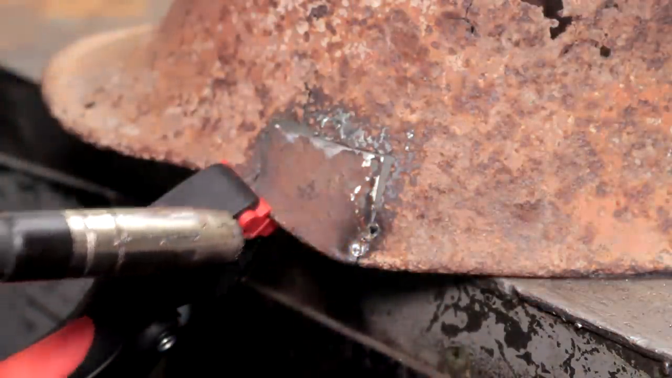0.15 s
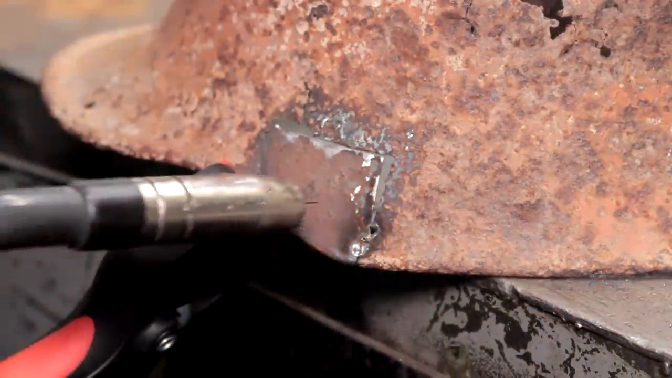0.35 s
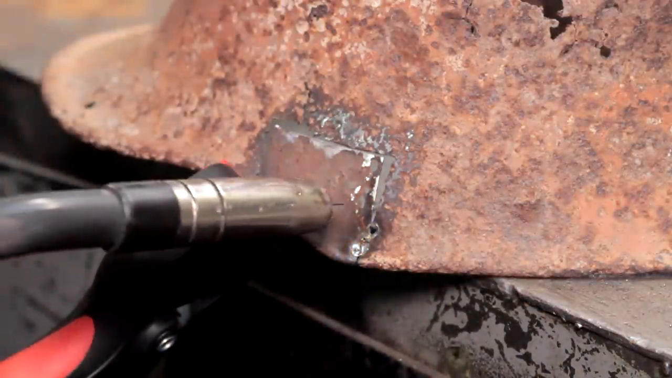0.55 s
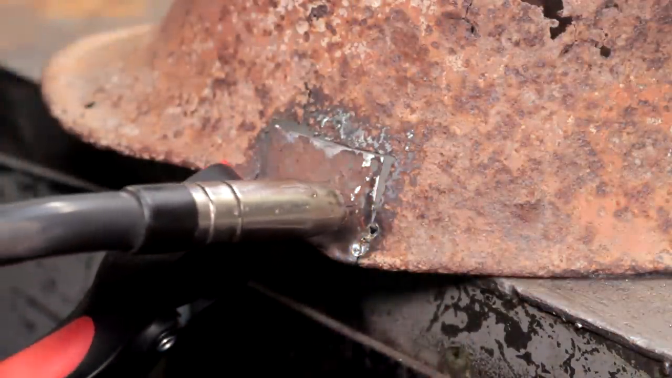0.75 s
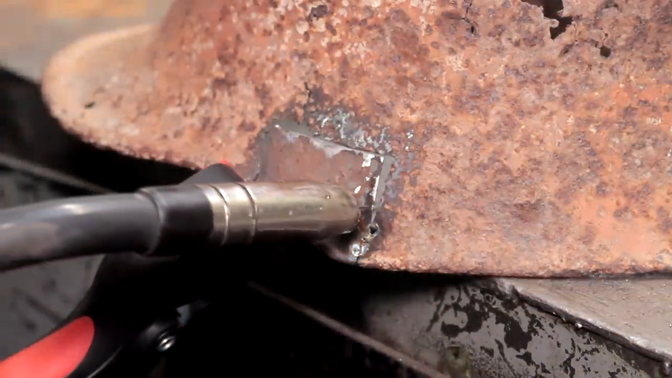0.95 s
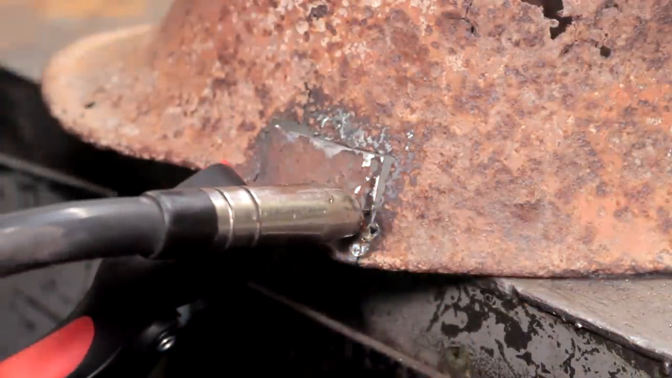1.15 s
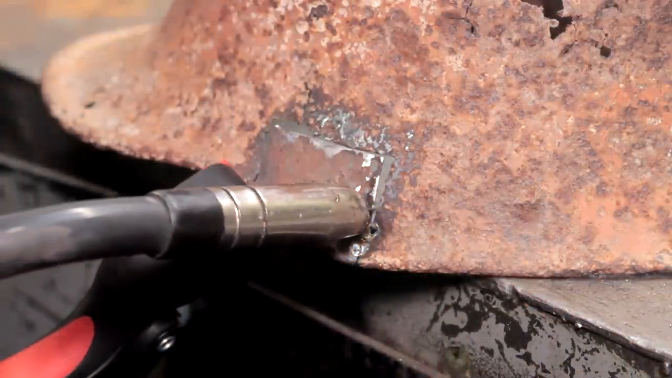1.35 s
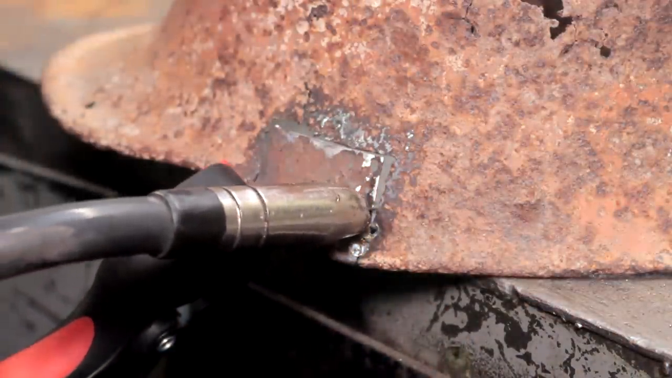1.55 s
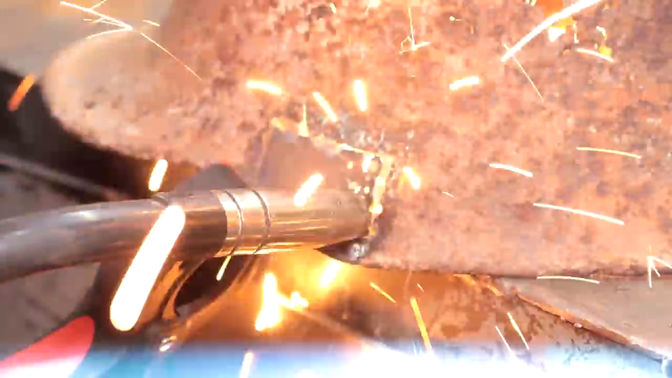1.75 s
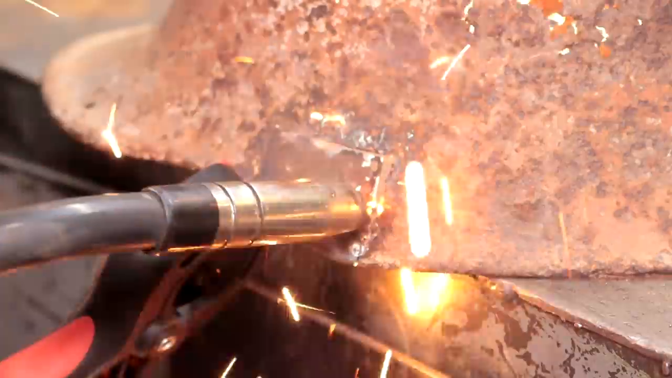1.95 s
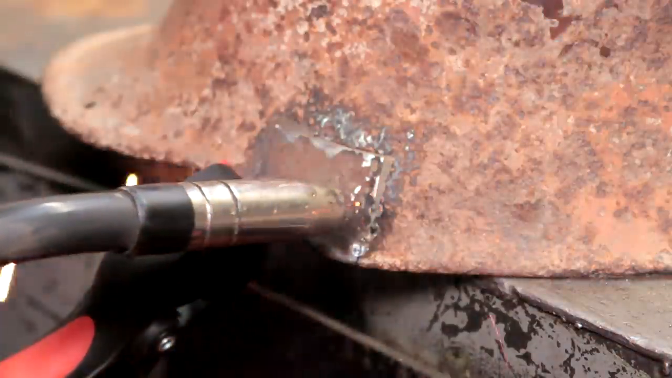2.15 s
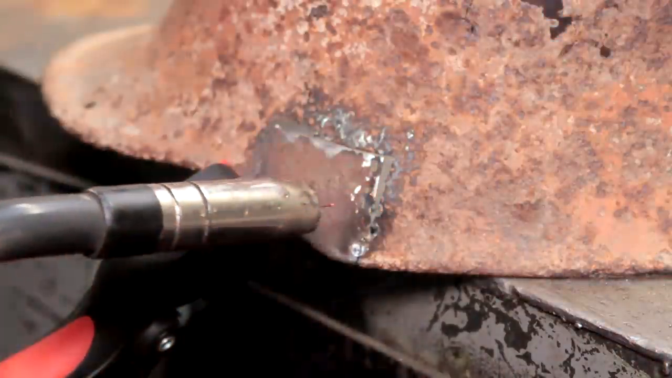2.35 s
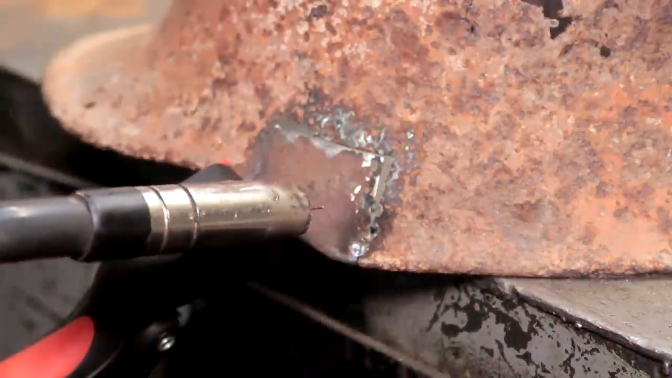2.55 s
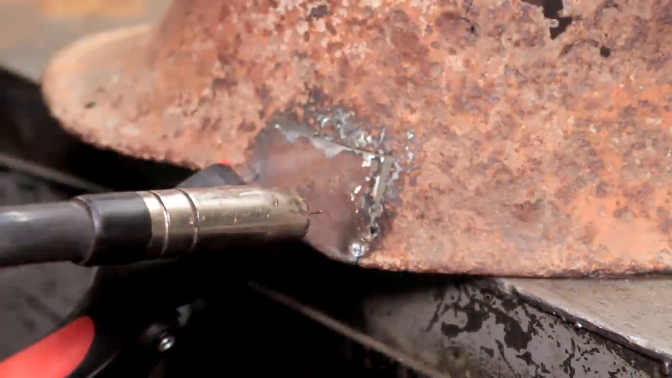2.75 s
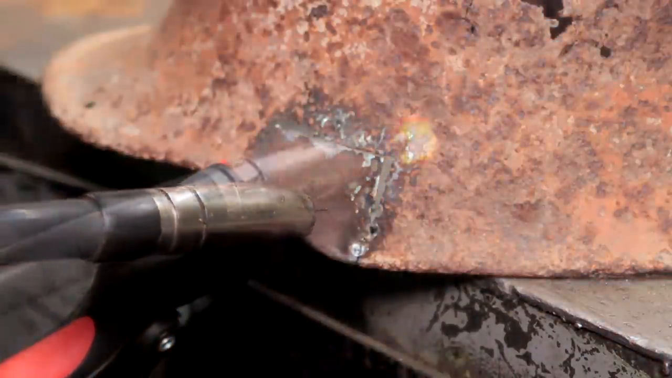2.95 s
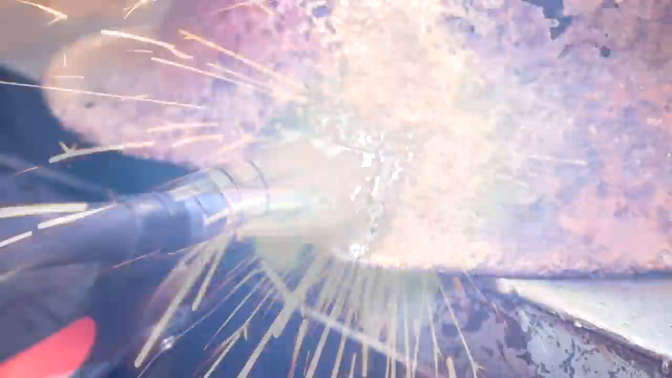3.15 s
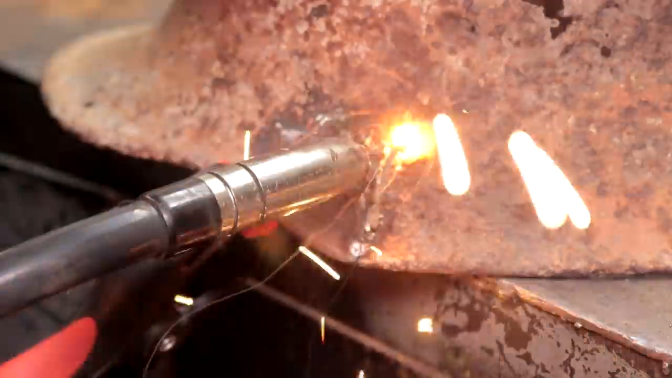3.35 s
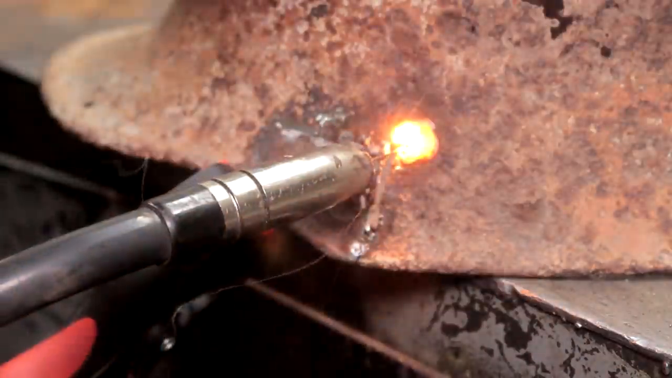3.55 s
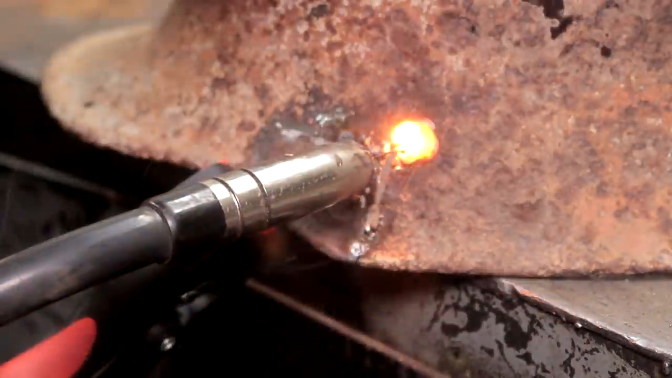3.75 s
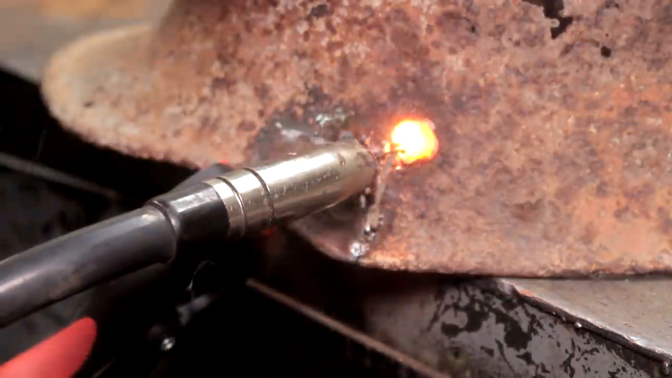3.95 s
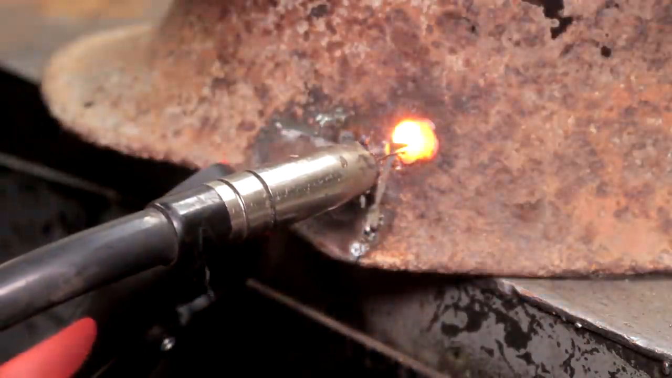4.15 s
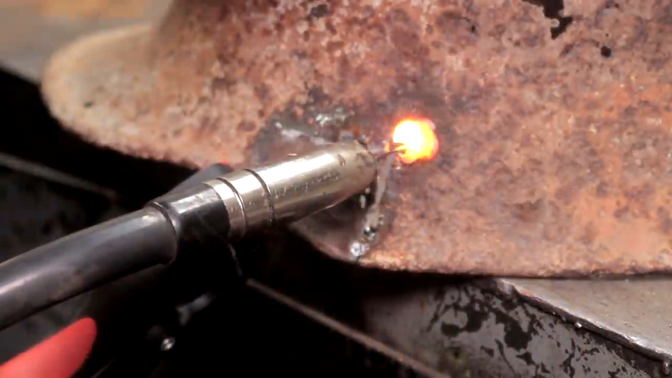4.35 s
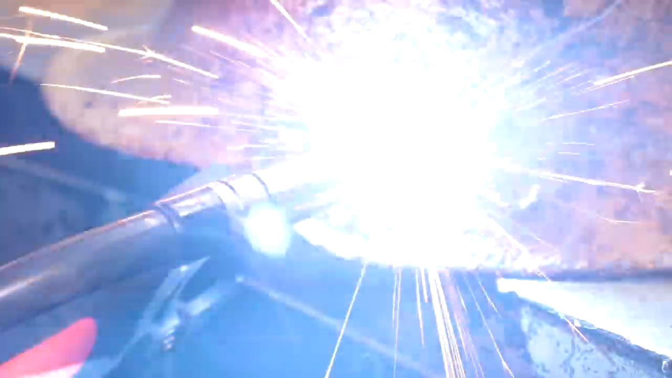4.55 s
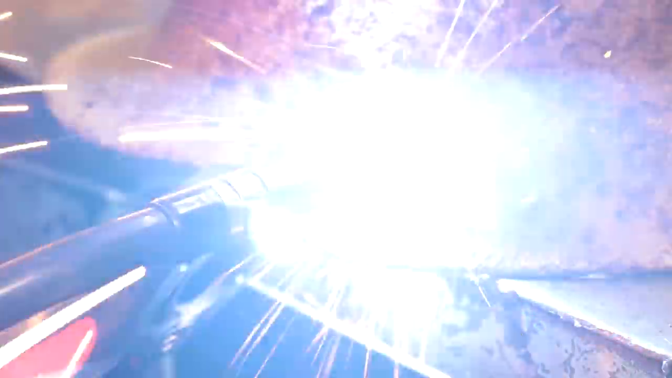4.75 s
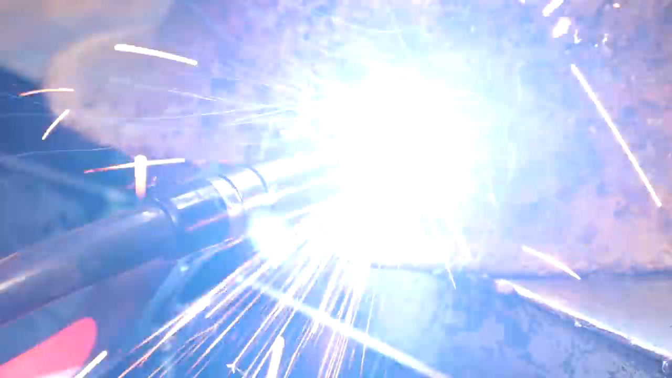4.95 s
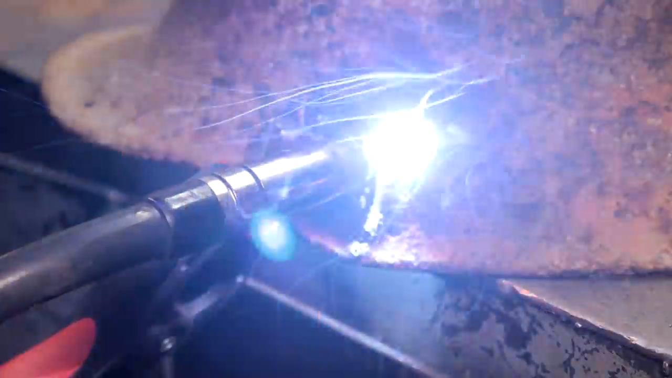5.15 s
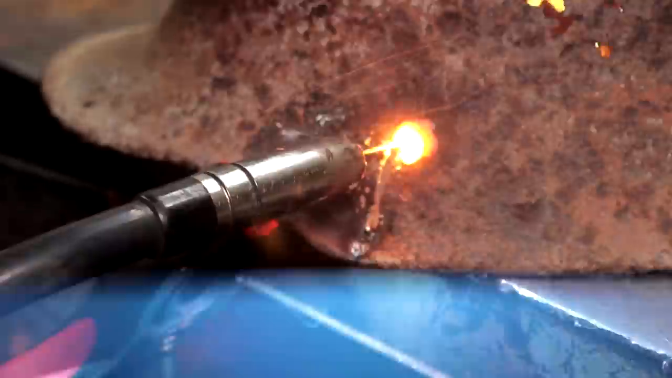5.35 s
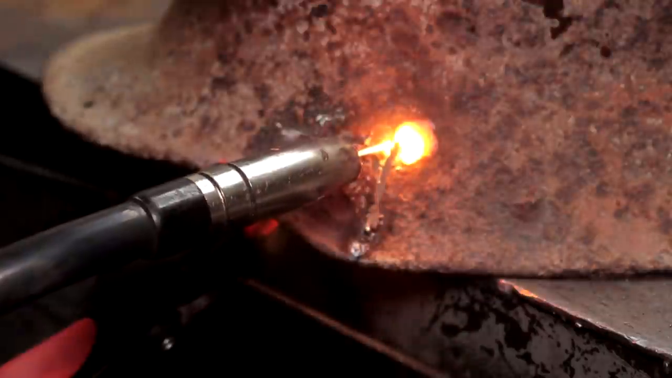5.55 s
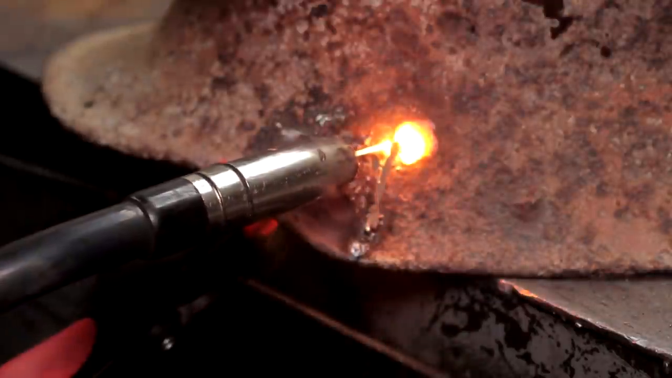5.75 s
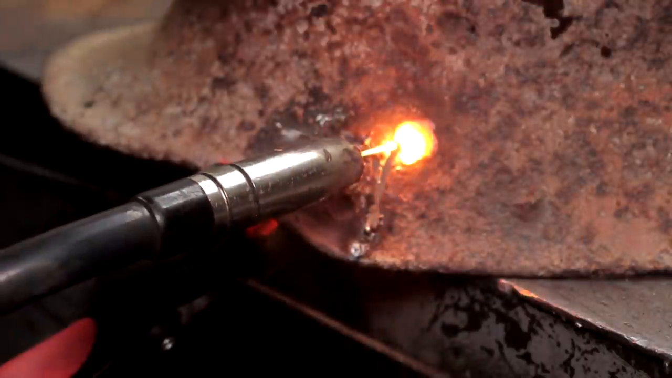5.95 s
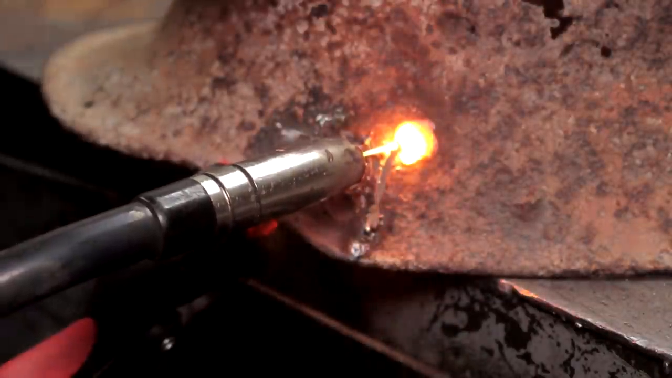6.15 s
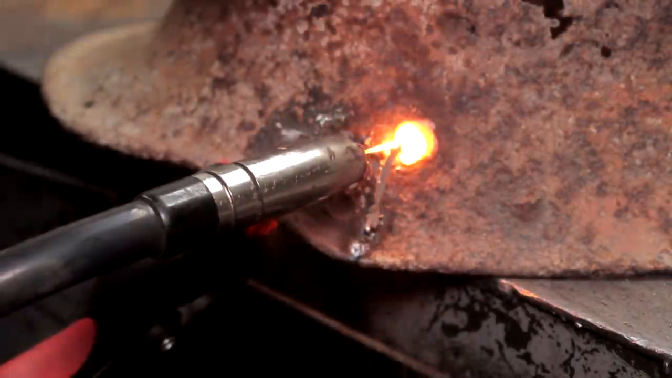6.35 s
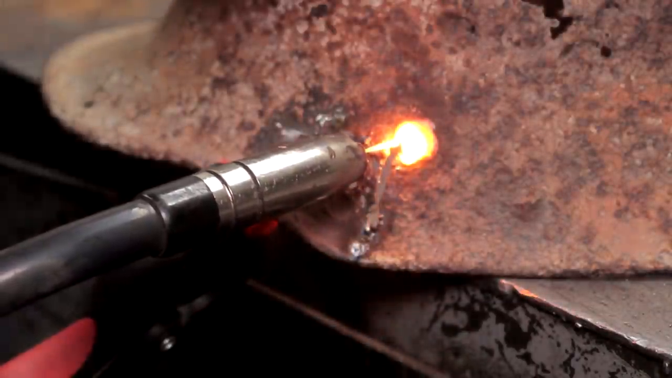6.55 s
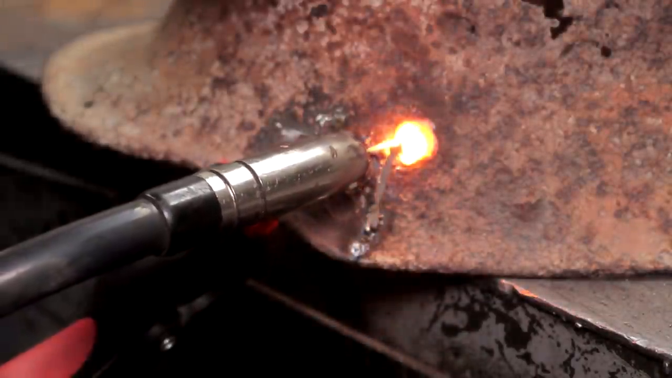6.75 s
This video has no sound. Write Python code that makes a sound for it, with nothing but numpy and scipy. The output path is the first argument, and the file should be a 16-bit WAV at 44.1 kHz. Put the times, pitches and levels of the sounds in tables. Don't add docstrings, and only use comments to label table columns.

```python
import sys
import numpy as np
from scipy import signal
from scipy.fft import rfft, irfft
from scipy.io import wavfile
from scipy.ndimage import uniform_filter1d

SR = 44100
rng = np.random.default_rng(int(sys.argv[2]) if len(sys.argv) > 2 else 0)


def master_out(mix):
    frames = np.transpose(np.atleast_2d(mix))
    ceiling = np.clip(frames, -1, 1)
    pcm = np.round(ceiling * 32767).astype(np.int16)
    wavfile.write(sys.argv[1], SR, pcm)


def linear_from_db(decibels):
    return 10 ** (np.asarray(decibels, float) / 20)


N = 299880


def evened(x):
    return x / np.sqrt(np.mean(x ** 2) + 1e-20)


def read(points, hz):
    f, value = np.transpose(points)
    return np.interp(np.log(hz + 1), np.log(f + 1), value)


def add(mix, s, sound):
    part = mix[..., round(s * SR):][..., :sound.shape[-1]]
    part += sound[..., :part.shape[-1]]


def colour(points):
    log_gain = np.log(linear_from_db(read(points, abs(np.fft.fftfreq(2048, 1 / SR)))))
    phase = -signal.hilbert(log_gain).imag
    taps = np.fft.ifft(np.exp(log_gain + 1j * phase)).real[:1024]
    return taps / np.linalg.norm(taps)


def noise(points, same, length=N):
    a, b = rng.standard_normal((2, length))
    pair = [a, same * a + np.sqrt(1 - same ** 2) * b]
    return signal.oaconvolve(pair, colour(points)[None], axes=1)[:, :length]


def wander(rate_hz):
    t = np.arange(N) / SR
    knots = np.arange(0, t[-1] + 1, 1 / rate_hz)
    return evened(np.interp(t, knots, rng.standard_normal(400)[:len(knots)]))


def shorts():
    # start_s, crack_db, sizzle_db
    first_tack = [(1.6331, -12, -30), (1.643, -36, -26.5), (1.6543, -13.5, -28), (1.6751, -9, -23),
                  (1.6957, -14.5, -29.5), (1.7135, -18, -29), (1.726, -33, -31.5), (1.8264, -29, -29.5),
                  (1.8545, -19.5, -26.5), (1.868, -33, -33), (1.9282, -23.5, -28.5), (1.943, -17.5, -30),
                  (2.284, -68, -66)]
    second_tack = [(3.0613, -21, -45.5), (3.1374, -42, -54), (3.1504, -36, -57), (3.1626, -30, -61),
                   (3.1749, -25, -40.5), (3.1882, -43, -35.5), (3.2018, -25, -34.5), (3.2156, -21.5, -42),
                   (3.227, -18.5, -37), (3.2402, -21, -35.5), (3.2566, -20, -37), (3.27, -18, -32),
                   (3.2857, -17.5, -30.5), (3.2991, -17, -35), (3.318, -19, -30.5), (3.3429, -22.5, -40)]
    third_tack = [(4.558, -27.5, -51), (4.612, -15.5, -37), (4.624, -22, -31.5), (4.6374, -24, -39),
                  (4.6466, -24, -38), (4.6549, -21.5, -37), (4.6695, -24.5, -44), (4.6743, -21, -33.5),
                  (4.6856, -29, -32.5), (4.6984, -23.5, -36.5), (4.7127, -20, -33.5), (4.7262, -15, -30.5),
                  (4.7422, -23, -29.5), (4.772, -15.5, -30), (4.8153, -15, -27.5), (4.862, -21, -28),
                  (4.8862, -16.5, -33),
                  (4.902, -19.5, -30.5), (4.9178, -21, -33), (4.9272, -25, -42.5), (4.9367, -21, -30),
                      (4.9541, -19, -34.5), (4.9592, -31, -33), (4.97, -20, -37), (4.9788, -28, -35),
                      (4.9876, -26.5, -33), (5.008, -32, -36), (5.0245, -25.5, -46), (5.0695, -23, -48),
                      (5.088, -23, -41), (5.1092, -20, -32), (5.1458, -23, -40), (5.178, -45, -49),
                      (5.223, -43, -57), (5.244, -18, -28), (5.2862, -26, -36), (5.3056, -20, -34),
                      (5.3201, -23, -33.5), (5.327, -27, -30.5), (5.4218, -19, -29.5)]
    return first_tack + second_tack + third_tack


def cracks():
    # pitch_hz, level_db
    crack_spectrum = [(300, -32), (700, -18), (1300, -10), (2700, -5), (5000, -3), (9000, -1), (13500, 0),
                      (16000, -3), (20000, -12)]
    # delay_ms, left_db, right_db
    reflections = [(.3, -11, -12), (1.1, -10, -5), (1.7, -13, -12), (2.2, -14, -11), (4.9, -19, -19)]
    # pitch_hz, level_db, t60_s
    steel_modes = [(1208, -7, 0.026), (2578, -18.5, .02), (4083, -10, 0.017), (6730, -9, 0.016)]
    cold_touches = [
        3.0615,
        4.558,
    ]
    t, paths, train = np.arange(2000) / SR, np.zeros((2, 400)), np.zeros((2, N))
    paths[:, 0] = 1
    for ms, *db in reflections:
        paths[:, round(ms * SR / 1e3)] += linear_from_db(db)

    for (s, db, _), rags in zip(shorts(), rng.standard_normal((len(shorts()), 3, 60))):
        burst = (0.12 * rags[0] + 0.14 * rags[1:]) * np.exp(-np.arange(60) / 14)
        burst[:, 0] = 1
        if min(abs(s - np.array(cold_touches))) < 0.003:
            burst = signal.lfilter([0.6], [1, -0.6], burst)
        add(train, s - 0.0001, linear_from_db(db) * burst)

    response = sum(linear_from_db(db - 60 * t / t60 - 21.5) * np.sin(2 * np.pi * hz * t) for hz, db, t60 in steel_modes)
    response[:1024] -= colour(crack_spectrum)
    shape = signal.fftconvolve(paths, response[None], axes=1)
    return linear_from_db(11.5) * signal.oaconvolve(train, shape, axes=1)[:, :N]


def sizzle():
    # pitch_hz, level_db
    sizzle_spectrum = [(350, -45.5), (600, -18.5), (1240, -3.5), (1830, -6.5), (2150, -4.5), (2370, -8),
                       (2800, -5), (8270, -1), (16000, -15)]
    rows, strikes = np.array(shorts()), np.zeros(N)
    strikes[np.round(rows[:, 0] * SR).astype(int)] = linear_from_db(rows[:, 2])
    t = np.arange(9000) / SR
    fade = linear_from_db(-120 * t / 0.066) + linear_from_db(-20 - 120 * t / 0.13)
    fade = fade * np.minimum(t / 0.0015, 1) ** 2
    power = abs(signal.oaconvolve(strikes ** 2, fade)[:N])
    grains = linear_from_db(3.7 * evened(uniform_filter1d(rng.standard_normal(N), size=24)))
    return linear_from_db(2) * np.sqrt(power) * evened(grains) * noise(sizzle_spectrum, same=0.35)


def push(ms):
    u = np.arange(1500) / SR * 1e3 / max(ms, 0.05)
    return np.exp(-2 * u) * np.cos(np.pi / 2 * u)


def blasts():
    # start_s, left_pressure, right_pressure, length_ms
    gas_blasts = [(1.643, 1, 0.8, 3.1), (1.6543, .05, 0.2, 2.7), (1.6758, .13, -0.2, 1.7),
                  (1.6957, 0.064, 0.29, 1), (1.8264, 0.06, .03, 1.9), (1.8544, 0.13, 0.1, 0.35),
                  (1.943, 0.28, 0.35, 0.78), (3.0602, 0.0041, -0.000063, 2), (3.1748, 0.037, 0.52, 2.9),
                  (3.1883, .16, 0.55, 5.6), (3.2146, .075, .34, 2.2), (3.2276, 0.59, -0.97, 3.1),
                  (3.2408, .096, .73, 6.2), (3.2568, 0.17, -0.61, 3), (3.27, .085, -0.26, .8),
                  (3.2857, 0.25, .26, 3.3), (3.3009, .014, .29, 4), (3.3182, 0.48, 0.13, 5.2),
                  (4.612, 0.73, 0.97, 0.69), (4.623, 0.36, -.63, 0.19), (4.6376, 0.23, 0.91, 0.077),
                   (4.6858, 0.056, -0.56, 0.52), (4.6985, 0.27, 0.19, 0.79), (4.7127, 1, -1.6, 0.075),
                   (4.7262, 0.21, 0.34, 0.57), (4.7436, 1, -2.2, 0.075), (4.772, 0.34, 0.81, 0.76),
                   (4.9377, 0.031, 0.11, 0.5), (4.9521, -0.083, 0.043, 0.45), (4.97, 0.0035, 0.059, .5),
                   (5.088, 0.073, 0.28, 0.45), (5.1087, -0.16, 0.224, 0.97), (5.1452, 0.086, 0.33, 0.46),
                   (5.245, 0.075, -0.0039, .9), (5.3056, 0.026, 0.025, .9), (5.423, 0.39, 0.64, 0.72)]
    # start_s, left_pressure, right_pressure, length_ms
    pinches = [
        (4.8158, 0.18, 0.79, 0.7),
        (4.8624, 0.17, 0.63, 0.78),
        (4.8843, 0.13, 0.39, 0.73),
    ]
    quick_ms, rebound_s, rebound_ms = 1.39, 0.00048, 6.9
    pinch_gap_s = 0.0011
    puff_db, puff_ms = -7, 0.59
    out = np.zeros((2, N))
    for s, left, right, ms in gas_blasts:
        add(out, s, np.outer([left, right], push(ms)))
        back = -0.181 * np.exp(-np.log(max(ms, 0.05) / quick_ms) ** 2)
        add(out, s + rebound_s, back * np.outer([left, right], push(rebound_ms)))

    for s, left, right, ms in pinches:
        add(out, s, -np.outer([left, right], push(ms)))
        add(out, s + pinch_gap_s, np.outer([1.03 * left, right], push(1.09 * ms)))

    for (s, db, _), chance in zip(shorts(), rng.standard_normal((len(shorts()), 3))):
        puff = push(puff_ms * np.exp(0.63 * chance[2]))
        add(out, s, linear_from_db(db + puff_db) * np.outer(chance[:2], puff))
    out = signal.sosfilt(signal.butter(2, 165, "high", fs=SR, output="sos"), out)
    return signal.sosfilt(signal.butter(2, 3500, fs=SR, output="sos"), out)


def gas():
    # open_s, arc_out_s, gas_flow_db, feeder_db
    pulls = [
        (1.518, 2.012, -62.5, -67.5),
        (2.972, 3.4, -65.5, -65.5),
        (4.368, 5.498, -66.5, -67),
        (6.763, 6.9, -64.5, -65),
    ]
    shutting = [
        2.15,
        3.612,
        5.708,
        7.0,
    ]
    # start_s, level_db, pitch_hz, t60_s
    knocks = [
        (1.526, -47, 1590, 0.028),
        (2.98, -51, 350, 0.044),
        (3.605, -49.5, 1590, 0.045),
        (3.61, -46, 514, 0.037),
        (3.658, -57.5, 400, 0.039),
        (4.37, -51, 1980, 0.054),
        (5.706, -52.5, 1878, 0.064),
        (5.71, -55, 520, 0.061),
        (6.764, -51, 3020, 0.05),
    ]
    # pitch_hz, level_db
    jet_spectrum = [(1290, -39.5), (2200, -9.5), (2360, -2), (2940, 1), (3390, -12.5), (4940, -2.5),
                    (6430, -6), (9980, -7), (11000, -17), (12000, -12.5), (15600, -48.5), (22000, -120)]
    # pitch_hz, level_db
    edge_spectrum = [(5500, -33.5), (7000, -6), (8800, 0), (10300, -6.5), (12500, 1), (14500, -2),
                     (16500, -14.5)]
    # pitch_hz, level_db
    feeder_spectrum = [(900, -39), (1300, -24), (1520, 1.5), (1800, -16.5), (2100, -7.5), (2600, -39.5)]
    flow_db, feed_db = np.array((-3, 4.5, 2.5, 3, -1)), np.array((4, 4.5, 3, 1, 1.5))
    edge_db = (-55, -50, -69, -66, -80)
    leak_db = (-86, -100)
    rise_s, settle_s, close_s, leak_s = 0.007, 0.032, 0.022, 0.3
    out, t = np.zeros((2, N)), np.arange(3000) / SR
    for (start, arc_out, pull_flow_db, pull_feed_db), shut in zip(pulls, shutting):
        s = [start, start + rise_s, start + settle_s, arc_out, shut, shut + close_s, shut + leak_s]
        at = np.arange(s[0], s[-1], 1 / SR)
        layers = ((pull_flow_db + flow_db, jet_spectrum), (edge_db, edge_spectrum),
                  (pull_feed_db + feed_db, feeder_spectrum))
        for db, points in layers:
            level = linear_from_db(np.interp(at, s, [*db, *leak_db]))
            add(out, start, level * noise(points, same=0.57, length=len(at)))

    for s, db, hz, t60 in knocks:
        knock = noise([(hz / 4, -50), (hz, 0), (hz * 3, -40)], same=0.74, length=len(t))
        add(out, s, linear_from_db(db - 60 * t / t60) * np.minimum(t / 0.0036, 1) * knock)
    return out


def fan():
    # time_s, blade_db, draught_db
    course = [(0, -60, -85), (.35, -58, -77), (1.5, -57, -70), (2.201, -59, -76), (2.85, -54.5, -70.5),
              (2.93, -66, -70), (3.08, -56.5, -74), (3.665, -57.5, -66.5), (3.68, -61.5, -85),
              (5.6, -61.5, -89), (6.2, -59.5, -81), (6.6, -60, -80), (6.8, -59, -70)]
    # multiple, first_weld_db, later_welds_db
    overtones = [(2, -11, -13.5), (3, -23, -13.5), (4, -22, -22), (5, -24, -16), (6, -42, -27),
                 (7, -24.5, -23), (8, -43, -33.5)]
    moved_s = 2.96
    s, *columns = np.transpose(course)
    t = np.arange(N) / SR
    db, draught_db = (np.interp(t, s, column) for column in columns)
    blade_hz = np.where(t < moved_s, 566.5, 568.6)
    whine_hz, whine_db = 2.286 * blade_hz, np.where(t < moved_s, -66.5, -62.5)
    rumble_hz, rumble_db = 325.7, -67 + 0.56 * (draught_db + 77.5)
    whistle_hz, whistle_db = 15390, -94.5

    turn = 2 * np.pi * np.cumsum(blade_hz + 0.35 * wander(rate_hz=15)) / SR
    turn = turn + [[0.285], [0]]
    blade = np.sin(turn) * linear_from_db(1.4 * wander(rate_hz=26))
    for k, first_db, later_db in overtones:
        overtone_db = np.where(t < moved_s, first_db, later_db) + 1.2 * wander(rate_hz=12)
        blade = blade + linear_from_db(overtone_db) * np.sin(k * turn)

    whine_turn = 2 * np.pi * np.cumsum(whine_hz + 0.44 * wander(rate_hz=15)) / SR
    whine = np.sin(whine_turn + [[0.7], [0]])
    rumble_turn = 2 * np.pi * np.cumsum(rumble_hz + 4 * wander(rate_hz=45)) / SR
    rumble = np.sin(rumble_turn) * linear_from_db(2.5 * wander(rate_hz=45))
    tones = linear_from_db(db) * blade + linear_from_db(whine_db + np.array([[2.2], [-2.2]])) * whine + linear_from_db(rumble_db - 2.5) * rumble
    whistle = linear_from_db(whistle_db) * np.sin(2 * np.pi * whistle_hz * t)

    draught_spectrum = [(60, -41), (130, -10), (200, 2.5), (270, 3.5), (450, 3.5), (900, -34.5)]  # Hz, dB
    draught = linear_from_db(draught_db + 1) * noise(draught_spectrum, same=0.87)
    return np.sqrt(2) * (tones + whistle) + draught


def air():
    # pitch_hz, level_db
    air_spectrum = [(60, -59.5), (130, -36.5), (250, -14), (500, -5.5), (900, -4.5), (1500, -3), (2500, -9),
                    (5000, -13), (8000, -24), (12000, -36.5), (13200, -54.5), (16000, -58.5)]
    # pitch_hz, correlation
    likeness = [(60, 0.83), (180, 0.75), (550, 1), (1650, -0.32), (4970, -0.06), (15000, -0.08)]
    hz = np.fft.rfftfreq(N, 1 / SR)
    a, b = rfft(rng.standard_normal((2, N)))
    same = np.clip(read(likeness, hz), -1, 1)
    z = np.array([a, same * a + np.sqrt(1 - same ** 2) * b]) * linear_from_db(read(air_spectrum, hz))
    return linear_from_db(-64) * evened(irfft(z, N))


def shop(x):
    # pitch_hz, t60_s
    decay = [(400, 0.45), (1300, 0.452), (3500, 0.59), (9000, 0.4), (15000, 0.24)]
    taps = np.zeros((2, SR // 2))
    slots = np.arange(260, SR // 2 - 20, 20)
    at = slots + rng.integers(0, 20, (2, len(slots)))
    np.put_along_axis(taps, at, rng.choice([-1., 1.], at.shape), 1)
    hz, t, z = signal.stft(taps, SR, nperseg=256)
    fade = linear_from_db(-60 * t / read(decay, hz)[:, None])
    tail = signal.istft(z * fade, SR, nperseg=256)[1]
    return signal.fftconvolve(x, tail / np.linalg.norm(tail[0]), axes=1)[:, :N]


def scene():
    # pitch_hz, left_minus_right_db
    port_balance = [(60, 0), (380, -3), (1290, -3.5), (2400, -2), (4400, 1.5), (8100, -.5), (11000, -4),
                    (14000, -11)]
    # time_s, level_db
    brightening = [(0, -32.5), (3.9, -21.5), (4.4, -9)]
    arc = cracks() + sizzle()
    arc = arc + linear_from_db(-12) * shop(arc)
    ports = linear_from_db(np.outer([0.5, -0.5], read(port_balance, np.fft.rfftfreq(N, 1 / SR))))
    arc = irfft(rfft(arc) * ports, N)
    treble = signal.sosfilt(signal.butter(2, 9500, "high", fs=SR, output="sos"), arc)
    arc = arc + linear_from_db(np.interp(np.arange(N) / SR, *np.transpose(brightening))) * treble
    arc = signal.sosfilt(signal.butter(2, 300, "high", fs=SR, output="sos"), arc)
    return arc + blasts() + gas() + fan() + air()


def top_cut(x):
    return signal.sosfilt(signal.butter(12, 16960, fs=SR, output="sos"), x)


def record(dry):
    held = dry / (1 + (dry / 0.58) ** 6) ** (1 / 6)

    def below(hz):
        taps = signal.firwin(601, hz, window=("kaiser", 8), fs=SR)
        return signal.oaconvolve(held, taps[None], "same")

    under, whole = below(15800), below(16750)
    return top_cut(under + linear_from_db(-30) * (whole - under))


dry = scene()
out = record(dry)
master_out(out)
```